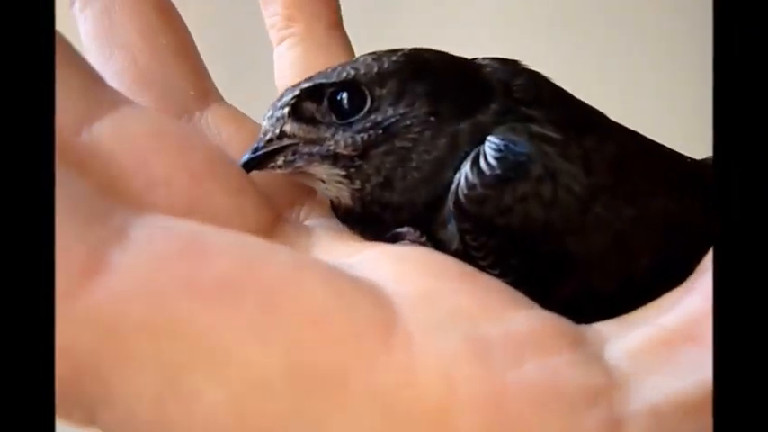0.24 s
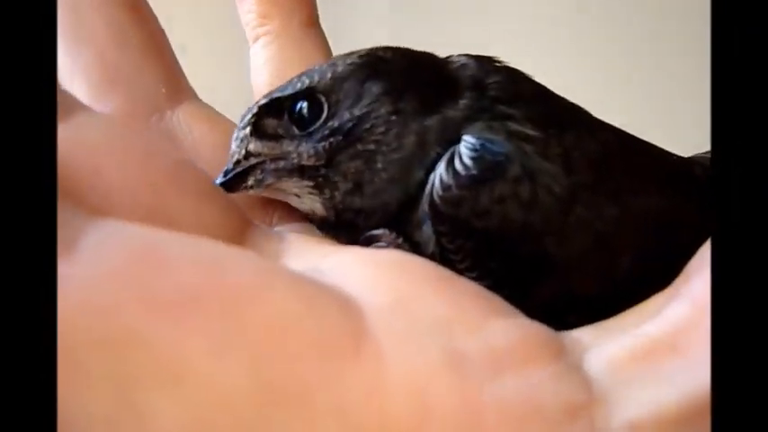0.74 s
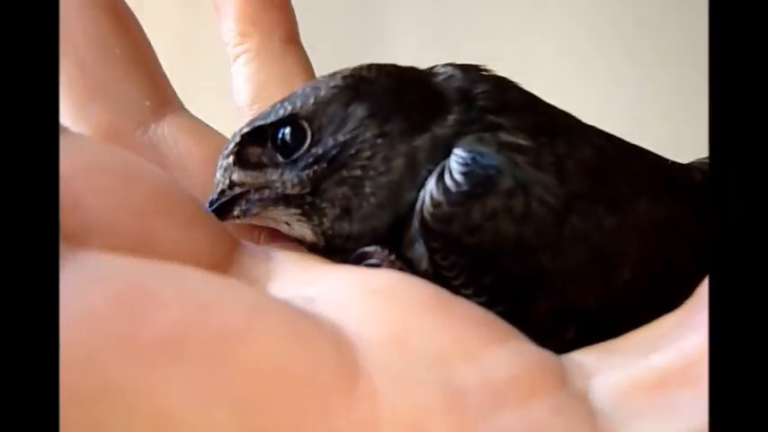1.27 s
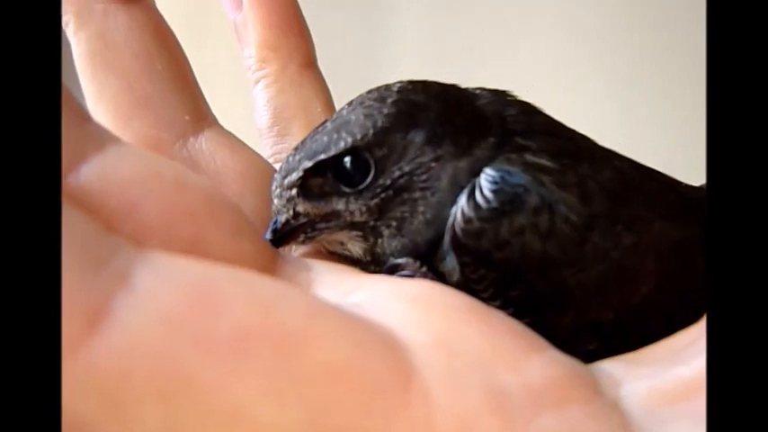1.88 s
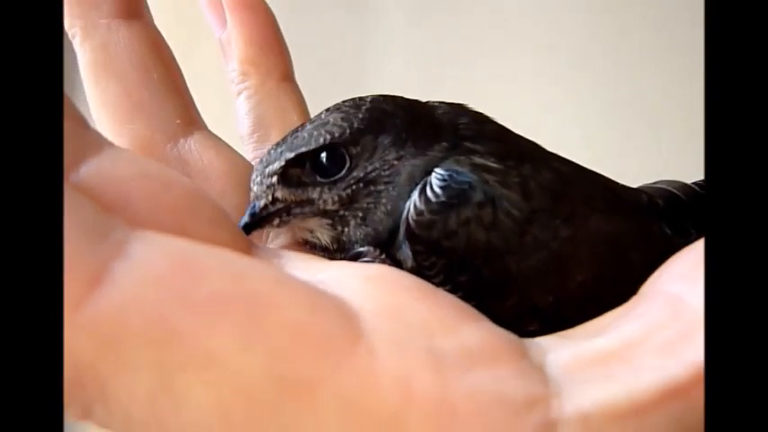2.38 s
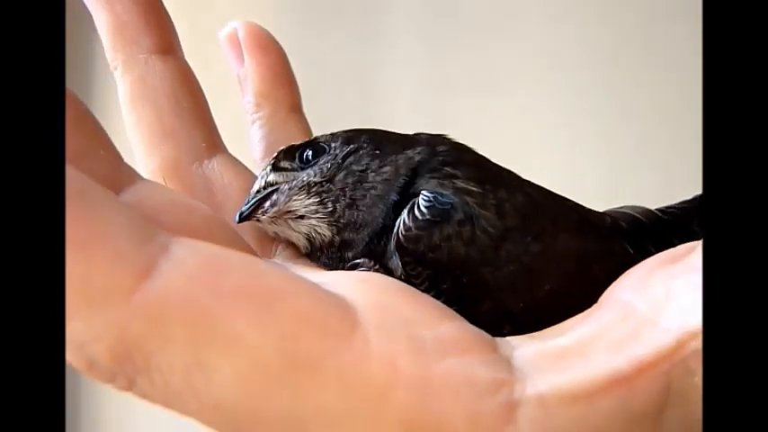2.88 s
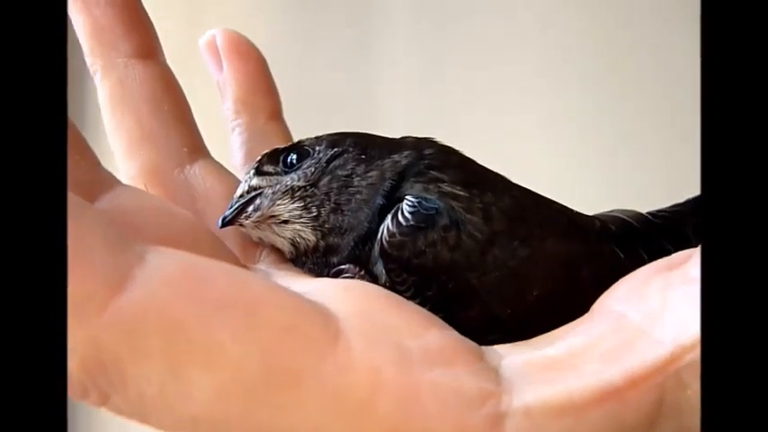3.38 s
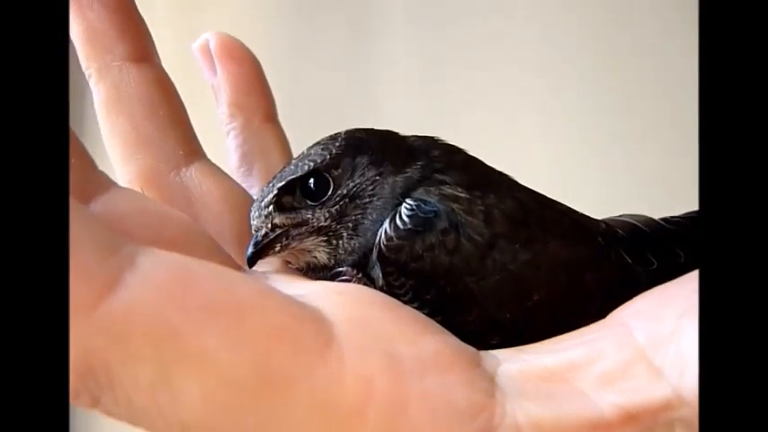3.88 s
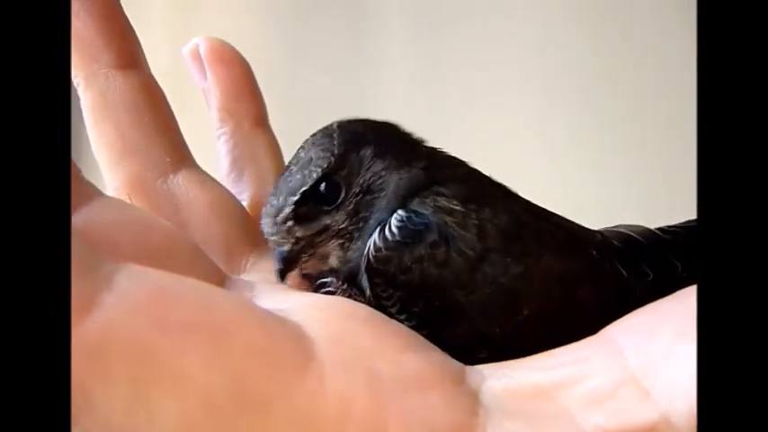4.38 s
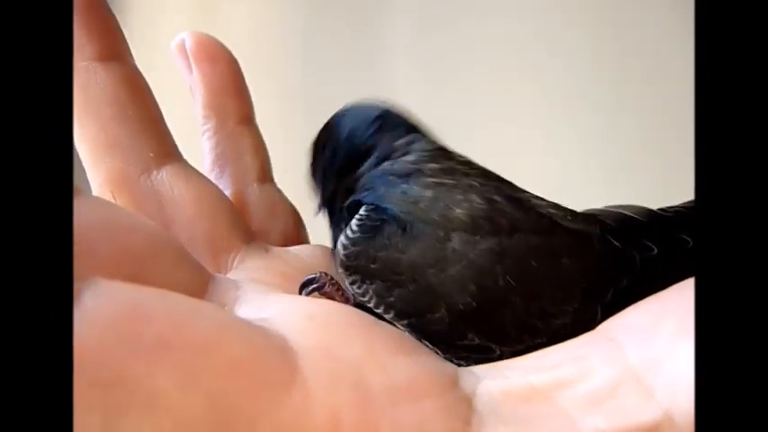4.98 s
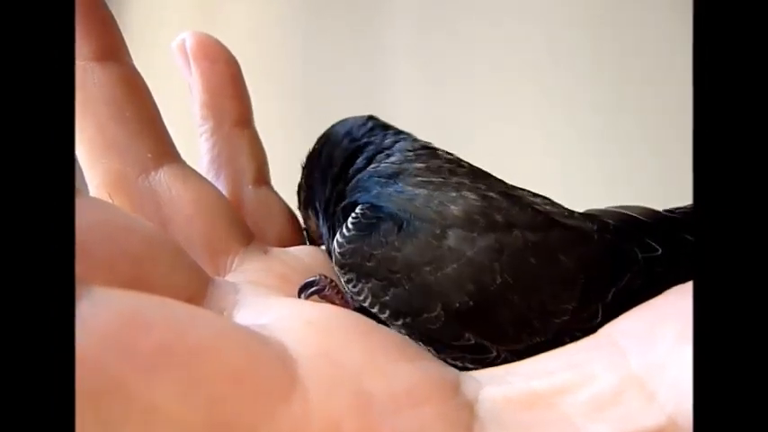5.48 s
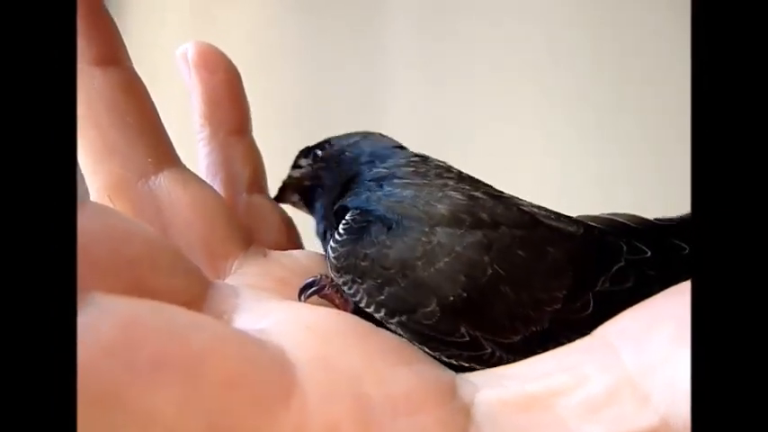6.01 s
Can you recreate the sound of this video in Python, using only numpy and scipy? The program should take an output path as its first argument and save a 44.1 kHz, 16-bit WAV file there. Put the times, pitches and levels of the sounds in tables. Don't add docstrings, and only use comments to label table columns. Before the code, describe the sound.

A small dark bird held in a hand trills thin, high, rapidly wavering whistles close by, over a faint fan drone in a hard-walled room.

```python
import sys
import numpy as np
from scipy import signal
from scipy.io import wavfile

SR = 44100
rng = np.random.default_rng(int(sys.argv[2]) if len(sys.argv) > 2 else 0)


def volts_from_decibels(level):
    exponent = np.asarray(level, float) / 20
    return 10 ** exponent


def inscribe(sig):
    pcm = np.round(np.clip(np.atleast_2d(sig).T, -1, 1) * 32767)
    wavfile.write(sys.argv[1], SR, pcm.astype(np.int16))


N = 275625

# start_s, level_db at the middle pitch, slope [dB per kHz], first_swing_db, lead_in after a break [ms]
TRILLS = [(0.0, -35.5, -2.5, 0, 10), (0.301, -38.5, -8, -2.5, 5), (0.369, -37.5, 3, -14.5, 12),
          (0.911, -37.5, 4.5, 1, 16), (1.568, -36.5, 4.5, -18, 12), (2.077, -50.5, -1, -3, 5),
          (2.154, -38, 4.5, -1, 14), (2.712, -38.5, 7.5, 3, 12), (3.264, -36.5, 5, 0, 7),
          (3.904, -38.5, 4.5, -1, 11), (4.538, -36, -.6, -0.5, 12), (5.135, -38.5, 4.5, -11.5, 17),
          (5.604, -39, 4.5, -2, 18), (6.114, -39, 2, -1, 10)]
# crest_s, crest_hz, dip_hz, dip_sag_db
LINKED = [(0.365, 3310, 2870, -8.5), (0.408, 3670, 2950, 3.5), (0.454, 3480, 3440, -1),
          (0.484, 3540, 3050, 1.5), (0.527, 4030, 3620, 4), (0.672, 4787, 4170, 11.5),
          (0.721, 4706, 4380, 2.5), (0.912, 4600, 3080, 22), (0.963, 4186, 3440, 2.5),
          (1.003, 4326, 3740, 6.5), (1.093, 4794, 4120, 13), (1.142, 4990, 4220, 8.5),
          (1.184, 4577, 4310, 4), (1.221, 4774, 4610, 4), (1.257, 5058, 4690, 3.5),
          (1.294, 4947, 4470, 4), (1.336, 5077, 4360, 9), (1.572, 3660, 3210, -7),
          (1.607, 4302, 3500, 5.5), (1.647, 3760, 3490, 3), (1.691, 4418, 3990, 9.5),
          (1.732, 4712, 4180, 7), (1.778, 4984, 4480, 6), (1.819, 4760, 4780, 5.5),
          (1.849, 5190, 4800, 7), (1.886, 5500, 4350, 11.5), (2.171, 4365, 3070, 2),
          (2.224, 4210, 3150, 8),
          (2.713, 3940, 3080, 9), (2.76, 4360, 3460, 8), (2.853, 4860, 3850, 14), (2.9, 4330, 4080, 1),
               (3.373, 3804, 3030, 9.5), (3.426, 3810, 3200, 7), (3.901, 4350, 3200, 14),
               (3.944, 3660, 3290, 3), (3.989, 4110, 3460, 10), (4.03, 4400, 3810, 14.5),
               (4.075, 4360, 3930, 6), (4.117, 4610, 4050, 6), (4.532, 4330, 3730, 1),
               (4.569, 4010, 3740, 1.5), (4.595, 3770, 3660, 3), (4.631, 4200, 4000, 0.5),
               (4.67, 4630, 4390, 2), (4.703, 4680, 4220, 4), (4.741, 4380, 3930, 3.5),
               (4.778, 4780, 3900, 5), (4.821, 4600, 4590, 0), (4.899, 5090, 4300, 6),
          (5.137, 4416, 3870, -6.5), (5.179, 4870, 3977, 8), (5.224, 5020, 3946, 6),
                  (5.609, 4340, 3740, 0), (5.648, 4347, 3690, 3), (5.688, 4210, 3480, 2.5),
                  (5.727, 4577, 3953, 4), (6.118, 4360, 3850, 3.5), (6.154, 4720, 4120, 0.5),
                  (6.192, 5020, 4156, 2.5)]
# crest_s, crest_hz, last_hz, fall_ms
BROKEN = [(0.014, 4643, 3770, 21), (0.06, 4612, 3820, 21), (0.117, 4659, 4110, 16.9),
          (0.298, 4310, 3466, 19), (0.561, 4640, 3890, 28), (0.617, 4773, 4000, 27),
          (0.76, 5305, 3878, 22), (1.043, 4745, 3950, 27), (1.381, 5685, 4000, 26),
          (1.93, 5980, 4280, 22), (2.074, 4490, 3940, 14), (2.266, 4502, 3700, 23),
          (2.314, 4660, 3940, 21), (2.36, 4995, 3870, 24), (2.407, 5145, 4060, 20),
          (2.457, 5486, 4060, 21), (2.505, 5503, 4070, 20), (2.803, 4250, 3710, 22),
          (2.937, 4493, 3790, 23), (2.984, 4808, 3780, 23), (3.031, 5020, 3870, 25),
          (3.265, 4510, 3460, 25), (3.33, 3746, 3050, 22), (3.468, 4156, 3650, 22),
          (3.515, 3870, 3500, 16), (3.554, 4020, 3570, 16), (3.6, 4110, 3700, 24),
          (3.644, 4010, 3720, 17), (3.698, 4423, 3750, 19), (3.747, 4213, 3700, 13),
          (4.157, 4750, 3880, 25), (4.206, 4820, 3970, 27), (4.25, 4500, 3930, 20),
               (4.296, 4600, 4010, 19), (4.343, 4830, 4030, 19), (4.398, 5030, 3960, 8),
               (4.848, 4760, 3720, 20), (4.922, 4490, 3770, 15), (4.972, 5180, 3940, 10),
               (5.264, 4980, 3900, 18), (5.307, 5050, 3900, 16), (5.346, 5300, 3960, 24),
               (5.392, 5330, 4000, 19), (5.432, 5600, 3850, 20), (5.766, 5050, 4000, 24),
               (5.81, 4900, 4090, 15), (5.852, 5220, 3950, 22), (5.893, 5320, 4000, 21),
               (5.941, 5800, 4050, 16), (6.234, 4880, 4300, 21)]
MIDDLE_HZ = 4500
DIP_SHARE, DIP_LEAN = .54, .25
BREAK_SHARE, BREAK_SAG_DB = .7, 19


def phrasing():
    linked = np.array(LINKED)
    broken = np.array(BROKEN)
    rows = np.vstack([linked, broken])
    order = np.argsort(rows[:, 0])
    crest_s, crest_hz, low_hz, last = rows[order].T
    breaks = order >= len(linked)

    trills = np.array(TRILLS)
    trill = np.searchsorted(trills[:, 0], crest_s + .02) - 1
    onset_s, db, slope_db, first_db, lead_ms = trills[trill].T
    first = np.diff(trill, prepend=-1) > 0
    crest_db = db + slope_db * (crest_hz - MIDDLE_HZ) / 1000 + first * first_db

    gap = np.diff(crest_s, append=crest_s[-1] + 1)
    fall = np.abs(crest_hz - low_hz)
    climb = np.abs(np.roll(crest_hz, -1) - low_hz)
    share = DIP_SHARE + DIP_LEAN * (fall / (fall + climb) - .5)
    whole_fall_s = np.minimum(last / 1000 / BREAK_SHARE, .9 * gap)
    dip_s = crest_s + np.where(breaks, whole_fall_s, share * gap)
    fallen = (1 - np.cos(np.pi * BREAK_SHARE)) / 2
    dip_hz = np.where(breaks, crest_hz - (crest_hz - low_hz) / fallen, low_hz)
    dip_db = crest_db - np.where(breaks, BREAK_SAG_DB, last)

    opens = np.r_[True, breaks[:-1]]
    starts = np.where(first, onset_s, crest_s - lead_ms / 1000)[opens]
    stops = (crest_s + last / 1000)[breaks]
    spans = zip(starts, stops, crest_s[opens], crest_hz[opens], crest_db[opens])
    pairs = (crest_s, dip_s), (crest_hz, dip_hz), (crest_db, dip_db)
    return [np.c_[pair].ravel() for pair in pairs], spans


ONSET_S, OFFSET_S = 0.0038, 0.0031
ONSET_SAG_DB = 4.5
CLIMB_HZ = 2.7
SNAP = .35
OCTAVE_DB, SHIMMER_DB, JITTER_HZ, RASP_DB = -33, 1.0, 15, -31


def swift():
    t = np.arange(N) / SR
    (times, pitches, levels), spans = phrasing()
    steps = np.arange(len(times))
    place = np.interp(t, times, steps)
    step, part = np.floor(place), place % 1
    climbing = step % 2
    glide = (1 - np.cos(np.pi * part)) / 2
    glide += SNAP * climbing * (1 - (1 - part) ** 2 - glide)
    pitch = np.interp(step + glide, steps, pitches)
    level_glide = np.where(climbing == 0, glide ** 2, 1 - (1 - glide) ** 2)
    level_db = np.interp(step + level_glide, steps, levels)

    gate = np.zeros(N)
    for start, stop, crest_s, crest_hz, crest_db in spans:
        span = slice(max(int((start - ONSET_S) * SR), 0), int((stop + OFFSET_S) * SR))
        edge = np.minimum((t[span] - start) / ONSET_S + .5, (stop - t[span]) / OFFSET_S + .5)
        gate[span] = np.maximum(gate[span], np.sin(np.pi / 2 * np.clip(edge, 0, 1)) ** 2)
        rise = slice(span.start, max(int(crest_s * SR), 0))
        pitch[rise] = crest_hz - CLIMB_HZ * (1000 * (crest_s - t[rise])) ** 2
        level_db[rise] = crest_db - ONSET_SAG_DB * (crest_hz - pitch[rise]) / 1000

    phase = 2 * np.pi * np.cumsum(pitch + JITTER_HZ * drift(150)) / SR
    level = gate * volts_from_decibels(level_db + SHIMMER_DB * drift(52))
    level *= 1 + volts_from_decibels(RASP_DB) * drift(900) * volts_from_decibels(5 * drift(30))
    return np.sqrt(2) * level * (np.sin(phase) + volts_from_decibels(OCTAVE_DB) * np.sin(2 * phase))


# start_s, stop_s
TURNS = [
    (5.07, 5.54),
    (5.75, 6.05),
]
TURN_DB, TURN_S = -13.5, .04


def facing():
    return volts_from_decibels(TURN_DB * sum(plateau(start, stop, TURN_S) for start, stop in TURNS))


# delay_s, level_db
HAND_ECHOES = [
    (.0011, -40.5),
    (.0027, -29),
]


def hand(x):
    n = np.arange(N)
    return x + sum(volts_from_decibels(db) * np.interp(n - lag_s * SR, n, x, left=0) for lag_s, db in HAND_ECHOES)


SCATTER_T60_S, SCATTER_DB = .035, -13.5


def scatter(x):
    t = np.arange(2205) / SR
    sparse = rng.random(len(t)) < .03
    paths = rng.standard_normal(len(t)) * sparse * volts_from_decibels(-60 * t / SCATTER_T60_S)
    return volts_from_decibels(SCATTER_DB) * signal.fftconvolve(x, paths / np.sqrt(np.sum(paths ** 2)))[:N]


ROOM_T60_S, ROOM_DB, ROOM_GAP_S = 0.46, -16, 0.0068
WALL_S, WALL_DB = 0.029, -31


def room(x):
    t = np.arange(SR) / SR
    build_up = np.clip(t / ROOM_GAP_S - .5, 0, 1)
    tail = rng.standard_normal(SR) * volts_from_decibels(-60 * t / ROOM_T60_S) * build_up
    tail *= volts_from_decibels(ROOM_DB) / np.sqrt(np.sum(tail ** 2))
    tail[round(WALL_S * SR)] += volts_from_decibels(WALL_DB)
    return signal.fftconvolve(x, tail)[:N]


# start_s, peak_db
TICKS = [(.3255, -59), (.571, -59), (.6735, -57), (1.23, -60), (2.2425, -61), (2.4365, -61), (2.542, -57),
         (2.689, -61), (2.896, -59), (2.951, -58), (3.667, -59), (3.878, -57), (4.042, -60), (4.076, -58),
         (4.131, -62), (5.333, -56), (5.854, -61), (5.895, -60)]


def ticks():
    out = np.zeros(N)
    s, db = np.transpose(TICKS)
    out[np.round(s * SR).astype(int)] = volts_from_decibels(db + 25) * rng.choice([-1, 1], len(s))
    return signal.sosfilt(signal.butter(2, 2500, "high", fs=SR, output="sos"), out)


# pitch_hz, width_hz, level_db (rms)
DUCT = [(213.4, 18, -64), (263, 50, -63), (586.4, 34, -70.5), (1695, 210, -70.5)]
# pitch_hz, level_db (rms)
HUM = [(457.5, -66), (476, -69), (532, -69.5)]
# start_s, stop_s, gain_db
SWELLS = [(0.1, 0.453, 8), (1.05, 1.4, 4), (1.85, 2.6, 5.5), (2.708, 2.98, 8), (3.148, 3.305, 4),
          (3.453, 3.904, 4), (4.347, 4.498, 4.5), (4.988, 5.402, 7), (5.92, 6.203, 8.5)]
DRONE_HZ, DRONE_WIDTH_HZ = 888, 95
DRONE_DB, SWELL_S = -67.5, 0.095


def fan():
    out = sum(volts_from_decibels(db) * resonant_noise(hz, width) for hz, width, db in DUCT)
    for hz, db in HUM:
        phase = 2 * np.pi * np.cumsum(hz + 2.45 * drift(4)) / SR
        out = out + np.sqrt(2) * volts_from_decibels(db + 1.9 * drift(5)) * np.sin(phase)
    swell_db = DRONE_DB + sum(db * plateau(start, stop, SWELL_S) for start, stop, db in SWELLS)
    drone = resonant_noise(DRONE_HZ, DRONE_WIDTH_HZ, order=2)
    return out + volts_from_decibels(swell_db + 3.0 * drift(18)) * drone


# pitch_hz, level_db (per Hz)
AIR = [(25, -19), (45, -4), (90, -2.5), (170, 0.5), (310, -1), (420, -3), (700, -5), (1150, -11.5),
       (1750, -6), (2050, -23.5), (2900, -15.5), (6500, -25.5), (8500, -20.5)]
AIR_DB = -54.5


def air():
    out = 0
    edges = 25 * 2 ** np.arange(0, 9, .5)
    white = rng.standard_normal((2, N + SR))
    hz, db = np.transpose(AIR)
    for k, (low, high) in enumerate(zip(edges, edges[1:])):
        sos = signal.butter(2, [low, high], "band", fs=SR, output="sos")
        band = signal.sosfilt(sos, white[k % 2])[SR:]
        band_db = np.interp(np.log(low * high) / 2, np.log(hz), db)
        out = out + band * volts_from_decibels(band_db + 0.7 * drift(10.0))
    return volts_from_decibels(AIR_DB - 1.63) * rms_one(out)


# pitch_hz, level_db (rms)
WHINE = [(6223, -89), (6667, -91), (7364, -88)]


def whine():
    t = np.arange(N) / SR
    return sum(np.sqrt(2) * volts_from_decibels(db) * np.sin(2 * np.pi * hz * t) for hz, db in WHINE)


def rms_one(x):
    return x / np.sqrt(np.mean(x ** 2) + 1e-20)


def drift(rate_hz):
    r = np.exp(-2 * np.pi * rate_hz / SR)
    return rms_one(signal.lfilter([1], [1, -2 * r, r * r], rng.standard_normal(N + SR))[SR:])


def resonant_noise(hz, width_hz, order=1):
    r = np.exp(-np.pi * width_hz / SR)
    x = rng.standard_normal(N + SR)
    for _ in range(order):
        x = signal.lfilter([1, 0, -1], [1, -2 * r * np.cos(2 * np.pi * hz / SR), r * r], x)
    return rms_one(x[SR:])


def plateau(start, stop, edge_s):
    t = np.arange(N) / SR
    return np.clip(np.minimum(t - start, stop - t) / edge_s + .5, 0, 1)


def scene():
    bird, toward = swift(), facing()
    near = toward * hand(bird) + scatter((1 - toward) * bird)
    return (near + room(bird) + ticks() + fan() + air())[None]


def top_cut(x):
    return signal.sosfilt(signal.butter(12, 8250, fs=SR, output="sos"), x)


OFFSET = -.0352
CUTOFF_HZ = 7600


def record(dry):
    low_pass = signal.butter(32, CUTOFF_HZ, fs=SR, output="sos")
    mix = signal.sosfilt(low_pass, dry + whine()) + OFFSET
    return top_cut(mix)


dry = scene()
out = record(dry)
inscribe(out)
```